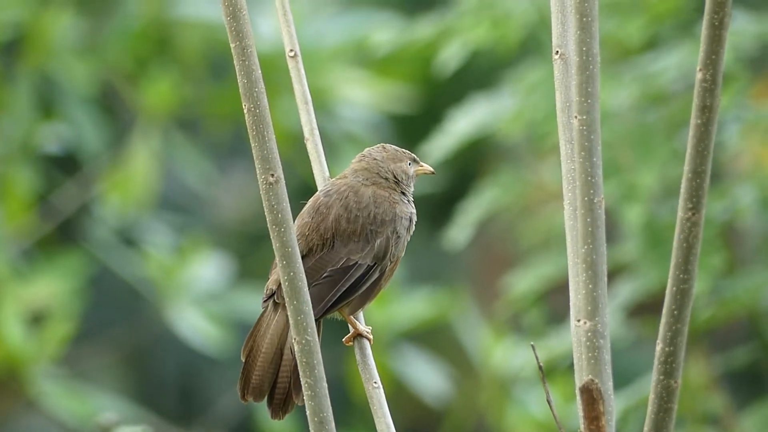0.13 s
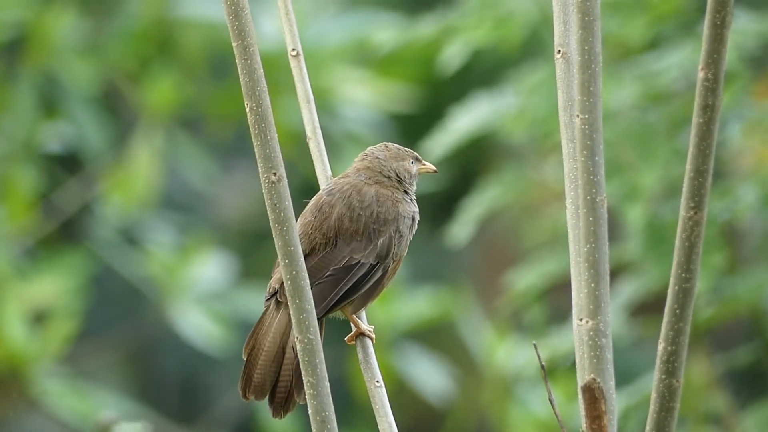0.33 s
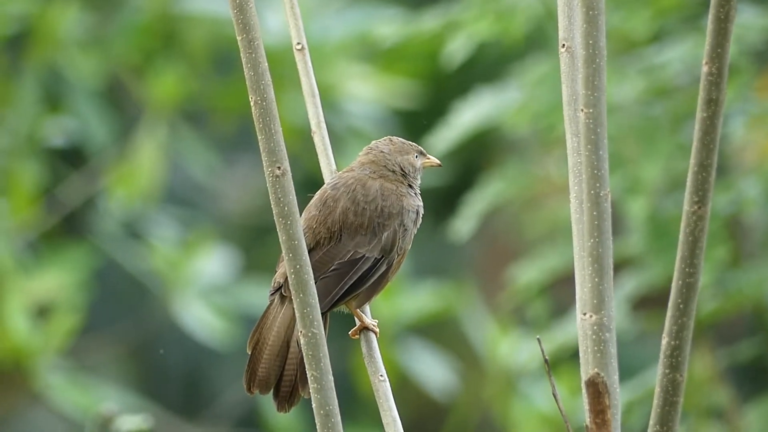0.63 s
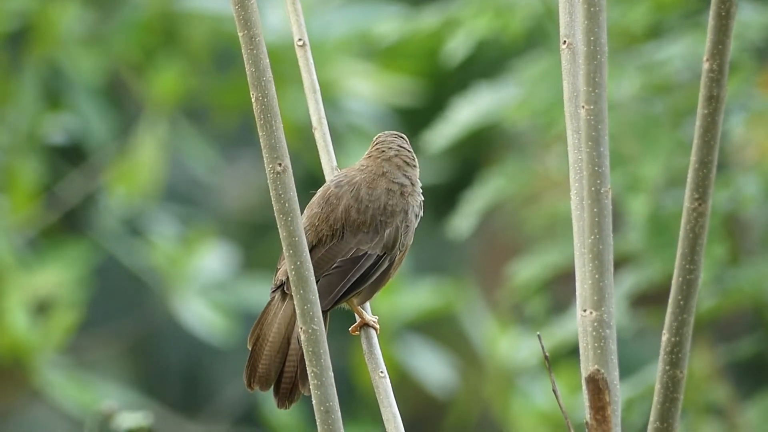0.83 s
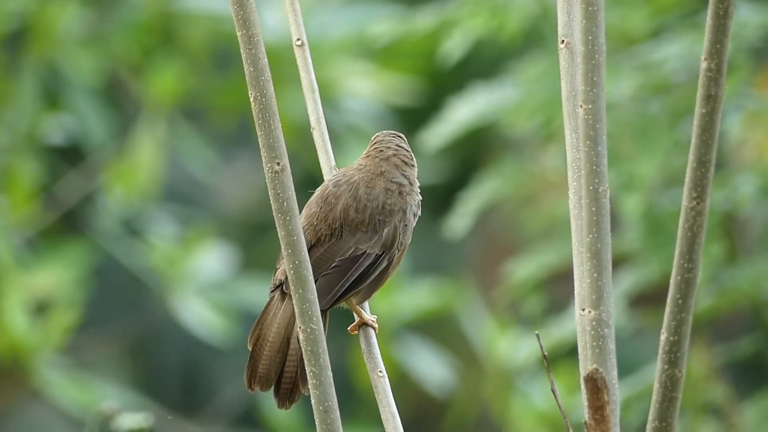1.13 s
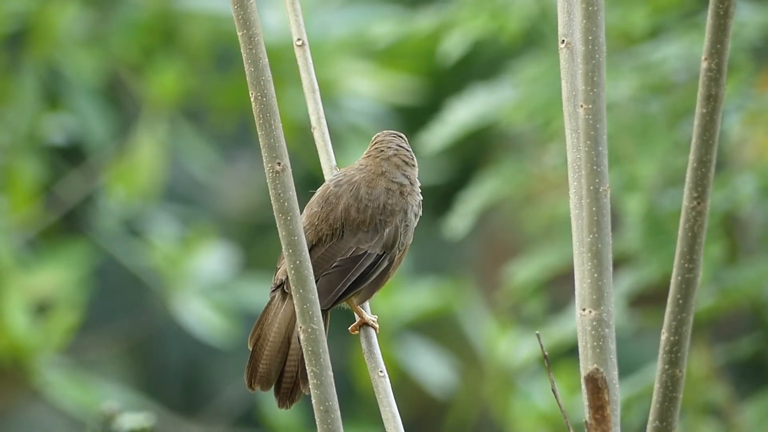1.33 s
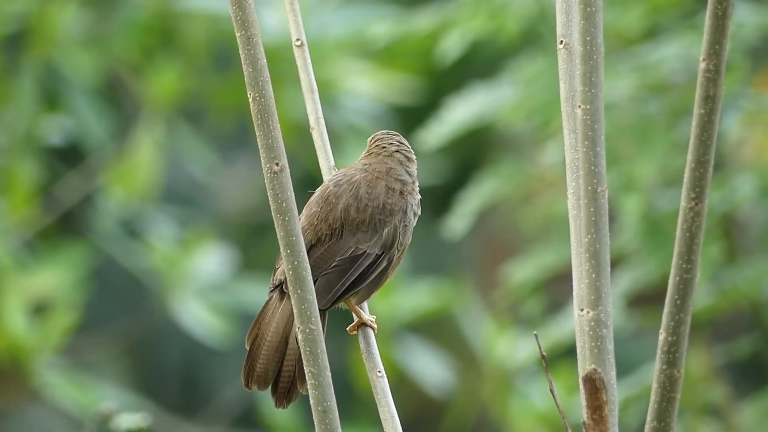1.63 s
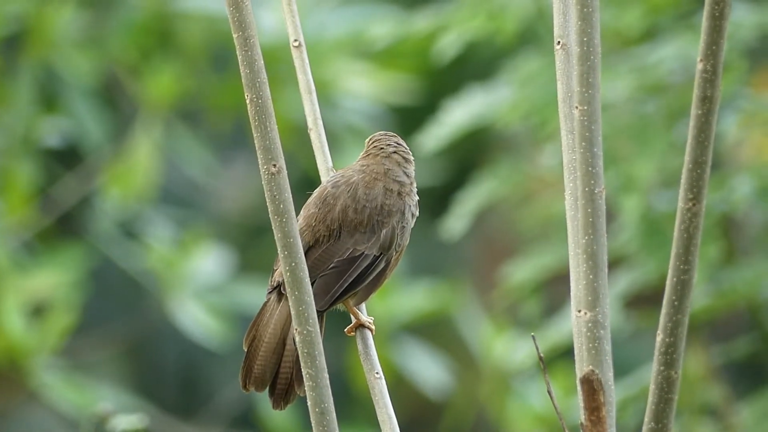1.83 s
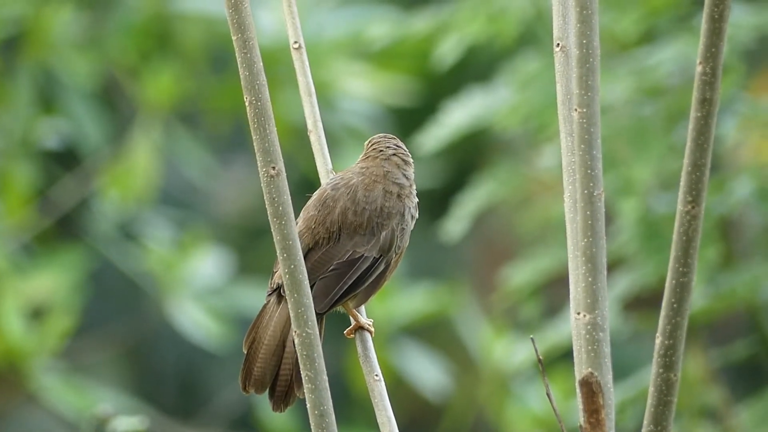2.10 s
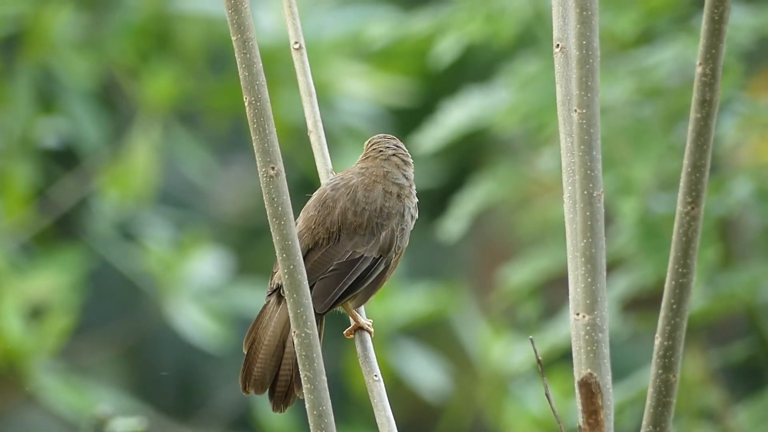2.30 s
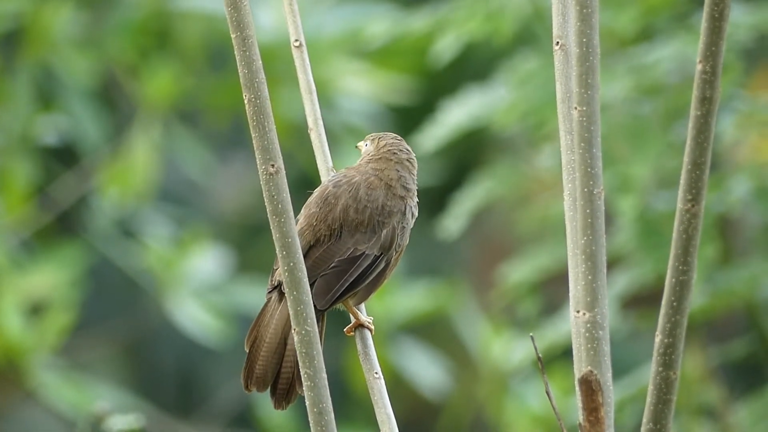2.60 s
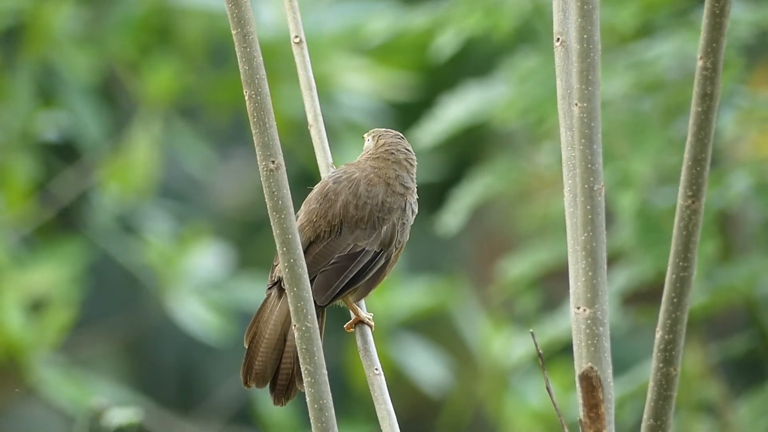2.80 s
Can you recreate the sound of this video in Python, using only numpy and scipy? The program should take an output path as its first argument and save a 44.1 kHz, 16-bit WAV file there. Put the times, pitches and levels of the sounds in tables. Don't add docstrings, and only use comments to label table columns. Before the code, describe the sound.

Unseen birds whistle and chirp among echoing trees, above high cicada buzz and faint low rumble

```python
import sys
import numpy as np
from scipy import signal
from scipy.fft import rfft, irfft
from scipy.io import wavfile
from scipy.ndimage import uniform_filter1d

SR = 44100
rng = np.random.default_rng(int(sys.argv[2]) if len(sys.argv) > 2 else 0)


def natural_amplitude(level_db):
    exponent = np.asarray(level_db, float) / 20
    return 10 ** exponent


def output_pcm(signal):
    pcm = np.clip(np.atleast_2d(signal).T, -1, 1) * 32767
    wavfile.write(sys.argv[1], SR, np.round(pcm).astype(np.int16))


N = 130095
TIME_S = np.arange(N) / SR
BIN_HZ = np.fft.rfftfreq(N, 1 / SR)


def table(rows, hz):
    rows = np.array(rows, float)
    return np.interp(np.log(hz + 1), np.log(rows[:, 0]), rows[:, 1])


def colour_gain(colour, rolloff_db):
    octaves_above = np.maximum(np.log2((BIN_HZ + 1) / colour[-1][0]), 0)
    return natural_amplitude(table(colour, BIN_HZ) - rolloff_db * octaves_above)


def level(x, db):
    return x * natural_amplitude(db) / np.sqrt(np.mean(x ** 2))


def walk(rate_hz):
    k = int(SR / rate_hz)
    held = np.repeat(rng.standard_normal(N // k + 1), k)
    return 1.3 * uniform_filter1d(uniform_filter1d(held, k), k)[:N]


def high_pass(x, order, hz):
    return signal.sosfilt(signal.butter(order, hz, "high", fs=SR, output="sos"), x)


def spread(mid, other):
    # (frequency [Hz], side minus mid [dB])
    side_db = [(60, -14), (150, -6), (300, -14.5), (1000, -26), (3000, -12.5), (6500, -16.5), (10000, -5.5),
               (12500, -14)]
    side = irfft(rfft(other) * natural_amplitude(table(side_db, BIN_HZ)), N)
    return np.array([mid + side, mid - side])


def wash(colour, swell_db, flicker_db):
    out = 0
    pair = rfft(rng.standard_normal((2, N))) * colour_gain(colour, 60)
    place = 3 * np.log2(BIN_HZ / 200 + 1)
    for k in range(20):
        share = np.cos(np.pi / 2 * np.clip(place - k, -1, 1)) ** 2
        out = out + irfft(pair * share, N) * natural_amplitude(swell_db * walk(2.56) + flicker_db * walk(11))
    return spread(*out)


def voice(phase, octave_db, third_db):
    overtones = natural_amplitude(octave_db) * np.sin(2 * phase) + natural_amplitude(third_db) * np.sin(3 * phase)
    return np.sqrt(2) * (np.sin(phase) + overtones)


def whistle(hz, gain, octave_db, third_db, waver):
    phase = 2 * np.pi * np.cumsum(hz * (1 + waver * walk(60))) / SR
    return gain * voice(phase, octave_db, third_db)


def phrase(rows):
    s, hz, db = np.array(rows, float).T
    pitch_hz = uniform_filter1d(np.interp(TIME_S, s, hz), size=400)
    return pitch_hz, natural_amplitude(np.interp(TIME_S, s, db, -140, -140))


def notes(rows, edge, octave_db, third_db):
    out = np.zeros(N)
    for s, length_s, a_hz, b_hz, db in rows:
        u = np.clip((TIME_S - s) / length_s, 0, 1)
        on = (u > 0) & (u < 1)
        u = u[on]
        fade = np.sin(np.pi / 2 * np.clip(np.minimum(u, 1 - u) / edge, 0, 1)) ** 2
        glide_hz = a_hz + (b_hz - a_hz) * u * u * (3 - 2 * u)
        phase = 2 * np.pi * np.cumsum(glide_hz) / SR
        out[on] += natural_amplitude(db) * fade * voice(phase, octave_db, third_db)
    return out


def forest(x, direct_db, wet_db, t60_s):
    t = np.arange(SR) / SR
    decay = np.exp(-np.log(1000) * t / t60_s) * np.minimum(t / .004, 1)
    tail = rng.standard_normal((2, SR)) * decay
    side_db = -24
    tail *= natural_amplitude(np.array([[0], [side_db]]) + wet_db) / np.sqrt(np.sum(tail[0] ** 2))
    mid, side = signal.fftconvolve(x[None], tail, axes=1)[:, :N]
    return np.array([mid + side, mid - side]) + x * natural_amplitude(direct_db)


def drone():
    # (frequency [Hz], level [dB per Hz])
    drone_colour = [(60, -35), (200, -30), (330, -11), (450, -3), (620, -11), (850, -0.5), (1270, 2.5),
                    (1550, -20)]
    return level(wash(drone_colour, 0.21, 1.76), -35.5)


def air_hiss():
    # (frequency [Hz], level [dB per Hz])
    hiss_colour = [(1000, -16), (1700, 4.5), (3000, 5), (4400, 1.5), (4950, -7), (8200, -14.5),
                   (11500, -12.5), (15500, -14)]
    return high_pass(level(wash(hiss_colour, 1.2, 1.5), -47), 2, 800)


def insects(hz, width_hz, pulse_hz, depth, db, patchy_db):
    throb_phase = 2 * np.pi * np.cumsum(pulse_hz * (1 + 0.019 * walk(2.93))) / SR
    throb = 1 + depth * np.sin(throb_phase)
    resonance = 1 / (1 + ((BIN_HZ - hz) / width_hz) ** 4)
    pair = irfft(rfft(rng.standard_normal((2, N))) * resonance, N)
    return level(spread(*(pair * throb * natural_amplitude(patchy_db * walk(10.28)))), db)


def near_notes():
    # (start [s], length [s], from [Hz], to [Hz], level [dB])
    near_rows = [
        (.008, 0.032, 2975, 2920, -31),
        (1.985, 0.028, 2950, 2820, -40),
        (2.025, 0.036, 2880, 2934, -37.5),
        (2.055, 0.044, 3050, 3120, -36.5),
    ]
    return forest(notes(near_rows, 0.28, -14.5, -18.5), -0.34, -10, .35)


def dove_hoots():
    # (start [s], length [s], from [Hz], to [Hz], level [dB])
    hoot_rows = [
        (.03, 0.054, 1220, 1437, -49),
        (.17, 0.07, 1277, 1233, -41),
        (.43, 0.095, 1165, 1095, -41),
        (.79, 0.071, 1280, 1400, -37),
        (.89, 0.15, 1280, 1260, -37.5),
        (1.26, 0.069, 474, 432, -37.5),
        (1.58, 0.104, 1306, 1380, -40.5),
        (2.32, .1, 1300, 1343, -38.5),
        (2.52, 0.072, 1204, 1240, -36.5),
    ]
    return forest(notes(hoot_rows, 0.19, -52, -47), -4.0, -3.5, 0.33)


def slur():
    # (time [s], pitch [Hz], level [dB])
    slur_rows = [
        (.046, 3560, -51),
        (.056, 3640, -35.5),
        (.085, 3520, -27.5),
        (.12, 3300, -27),
        (.142, 3123, -25),
        (.162, 2890, -33),
        (.178, 2682, -25.5),
        (.203, 2600, -33),
        (.218, 1970, -41.5),
    ]
    rattle = np.sin(2 * np.pi * np.cumsum(280 * (1 + 0.201 * walk(60.1))) / SR)
    tone = whistle(*phrase(slur_rows), -22, -34, .015)
    return tone * (1 + .36 * rattle) * (.85 + .45 * walk(700))


def spray():
    # (frequency [Hz], level [dB per Hz])
    breath_colour = [(1500, -28), (2100, -5), (4000, -1), (5800, -2), (7400, -3), (8000, -15), (8900, 4),
                     (10500, -19)]
    peak_s, width_s = .158, 0.033
    noise = irfft(rfft(rng.standard_normal(N)) * colour_gain(breath_colour, 40), N)
    return level(noise, -46) * np.exp(-.5 * ((TIME_S - peak_s) / width_s) ** 2)


def harsh_call():
    call = slur() + spray()
    return forest(call, -1.4, -0.5, 0.13) + forest(call * walk(600), -40, -9, 0.86)


def far_birds():
    # (start [s], length [s], from [Hz], to [Hz], level [dB])
    far_rows = [(.3, 0.093, 5030, 5000, -53), (.38, 0.074, 4700, 4580, -50),
                (.485, 0.053, 3646, 3830, -44.5), (.52, 0.1, 3860, 3740, -49),
                (1.36, 0.089, 3250, 3150, -49), (1.43, 0.153, 3150, 3006, -46.5),
                (1.56, .12, 2940, 2670, -45), (1.7, .1, 2830, 2735, -56), (1.96, 0.1, 2613, 2480, -44.5),
                (2.12, 0.091, 2470, 2890, -51), (2.17, 0.051, 3050, 3160, -51),
                (2.2, 0.052, 3220, 3127, -43.5), (2.24, 0.043, 3120, 2980, -45),
                (2.17, 0.031, 4610, 4630, -56), (2.42, 0.05, 4450, 4250, -56),
                (2.73, 0.055, 4544, 4610, -54), (2.6, 0.06, 3126, 2986, -45)]
    return forest(notes(far_rows, .35, -38, -50) * (1.0 + 0.79 * walk(260)), -1.5, -2.5, 0.85)


def pure_notes():
    # (start [s], length [s], from [Hz], to [Hz], level [dB])
    pure_rows = [
        (.718, 0.024, 4750, 4680, -56),
        (.952, 0.042, 2670, 2720, -40),
        (1.918, .022, 2694, 2830, -41),
        (1.932, 0.04, 2822, 2625, -36.5),
        (2.05, 0.054, 4540, 4630, -45),
        (2.49, 0.088, 3720, 3720, -50),
    ]
    return forest(notes(pure_rows, 0.19, -27, -40) * (1 + .3 * walk(150)), -2.2, -5, 0.28)


def songster():
    # (time [s], pitch [Hz], level
    # [dB])
    phrase_rows = [
        (.755, 3316, -50),
        (.772, 3600, -43.5),
        (.795, 3785, -43.5),
        (.85, 3700, -51),
        (.862, 3580, -59),
        (.872, 3745, -39),
        (.9, 4290, -41),
        (.93, 4550, -41),
        (.97, 4616, -44.5),
                   (1.0, 4577, -51), (1.1, 4580, -45), (1.165, 3896, -38.5), (1.188, 3813, -37.5),
                 (1.2, 3850, -42), (1.285, 4200, -49), (1.3, 4190, -43), (1.37, 3850, -39.5),
                 (1.41, 4100, -41.5), (1.46, 4210, -41.5), (1.501, 4366, -36), (1.649, 4342, -47),
                 (1.749, 3770, -35.5), (1.84, 3780, -51.5), (1.9, 4010, -31.5), (1.96, 3910, -41),
                 (2.141, 3882, -38.5), (2.21, 3900, -76)]
    song = whistle(*phrase(phrase_rows), -30, -34, 0.00378)
    bead_hz, bead_depth = 27, .4
    beads = 1 + bead_depth * np.sin(2 * np.pi * bead_hz * TIME_S)
    flutter = (1 + .5 * walk(130)) * beads
    return forest(song * flutter, -5, -2.5, .3) + forest(song * (.7 + .9 * walk(350)), -40, -1, 1.25)


def taps():
    # (time [s], level [dB], pitch [Hz])
    tap_rows = [
        (1.951, -12.5, 1280),
        (1.5, -32, 740),
        (2.235, -25, 1350),
    ]
    out, t60_s, attack_s = np.zeros(N), 0.011, 0.00046
    for s, db, hz in tap_rows:
        u = np.maximum(TIME_S - s, 0)
        ring = np.sin(2 * np.pi * hz * u) * np.exp(-np.log(1000) * u / t60_s)
        out += natural_amplitude(db) * ring * np.minimum(u / attack_s, 1)
    return forest(out, 0, -10, .1)


def rises():
    # (start [s], length [s], from [Hz], to [Hz], level [dB])
    rise_rows = [
        (2.335, .15, 2450, 3150, -47),
        (2.585, .12, 2620, 3350, -44),
        (2.8, .16, 2640, 3520, -43),
    ]
    # (share of length [0-1], share of rise [0-1], level [dB])
    rise_shape = [(0, 0, -14), (.15, .04, -5), (.32, .24, 2), (.48, .62, -7), (.65, .93, -11), (1, 1, -14)]
    u, up, shape_db = np.array(rise_shape).T
    out = np.zeros(N)
    for s, length_s, a_hz, b_hz, db in rise_rows:
        rows = np.c_[s + u * length_s, a_hz + up * (b_hz - a_hz), db + shape_db]
        out += whistle(*phrase(rows), -39, -50, 0.00289)
    return forest(out, 0, -8, .4)


def scene():
    cicadas = insects(6914, 297, 80, .3, -47.5, 1.0) + insects(6650, 510, 74, 0.24, -55.5, 2.4)
    crickets = insects(9876, 740, 133, 0.027, -52, 2.1)
    birds = near_notes() + dove_hoots() + harsh_call() + far_birds() + pure_notes() + songster()
    echoing = high_pass(birds + taps() + rises(), 2, 320)
    return drone() + air_hiss() + cicadas + crickets + echoing


def dropouts(x):
    # (from [Hz], to [Hz], share of time [0-1], changes [per s])
    weak_bands = [(4800, 5080, .55, 25), (5330, 5450, .12, 14), (5450, 5800, .08, 22), (7350, 7800, .2, 14),
                  (7800, 8250, .45, 11), (8250, 8600, .4, 11), (9000, 9600, .16, 30),
                  (9600, 10600, .12, 40), (10900, 11250, .3, 11), (15400, 15700, .55, 20),
                  (15150, 15400, .15, 20)]
    # first [Hz], end [Hz], step [Hz], width [Hz], share of time [0-1], changes [per s]
    streaks = (11350, 15000, 330, 130, .25, 16)
    first_hz, end_hz, step_hz, width_hz, thin_share, thin_rate = streaks
    thin = [(hz, hz + width_hz, thin_share, thin_rate) for hz in range(first_hz, end_hz, step_hz)]
    spectrum = rfft(x)
    for lo_hz, hi_hz, share, rate_hz in [*weak_bands, *thin]:
        k = int(SR / rate_hz)
        held = np.repeat(rng.random(N // k + 1) < share, k)[:N]
        off = uniform_filter1d(1. * held, size=500)
        x = x - off * irfft(spectrum * ((BIN_HZ >= lo_hz) & (BIN_HZ < hi_hz)), N)
    return x


def low_pass(x):
    return signal.sosfilt(signal.butter(12, 15610, fs=SR, output="sos"), x)


def record(dry):
    mix = dropouts(high_pass(dry, 3, 130))
    return low_pass(mix)


dry = scene()
out = record(dry)
output_pcm(out)
```